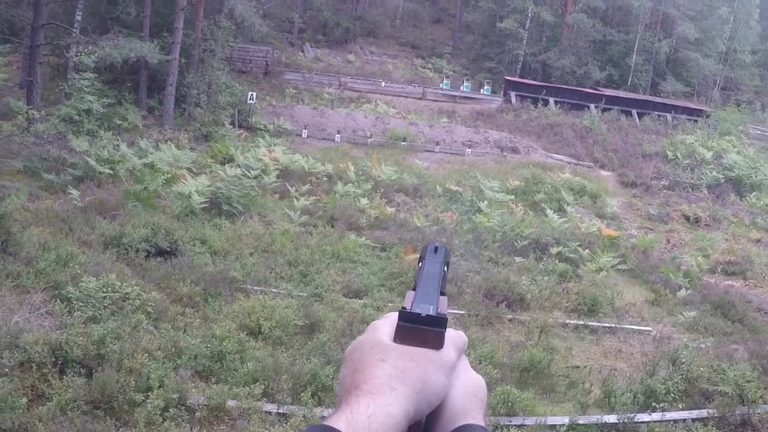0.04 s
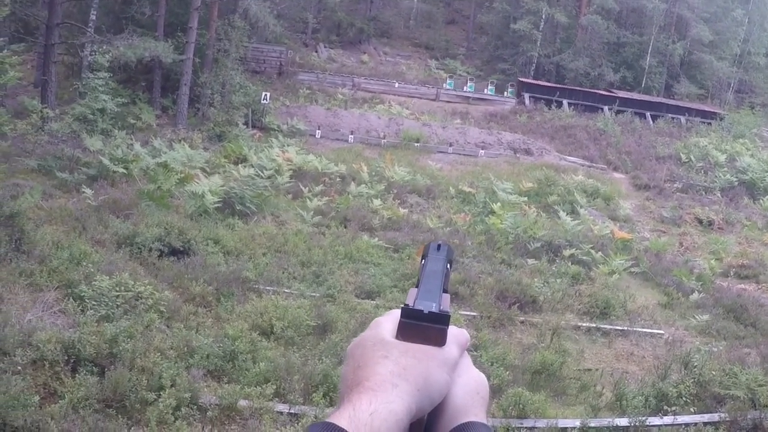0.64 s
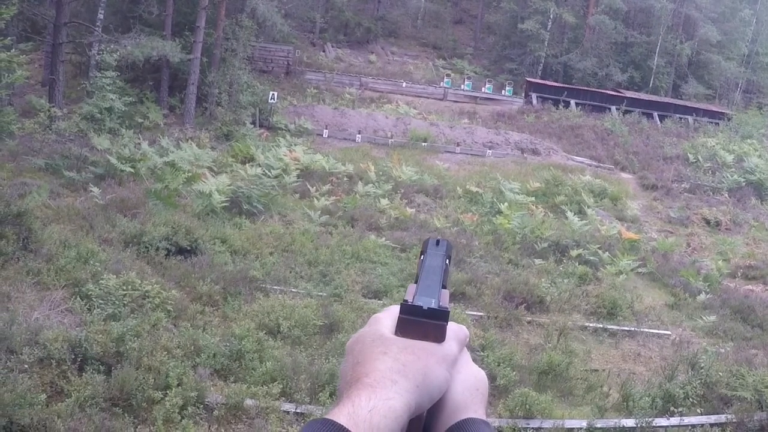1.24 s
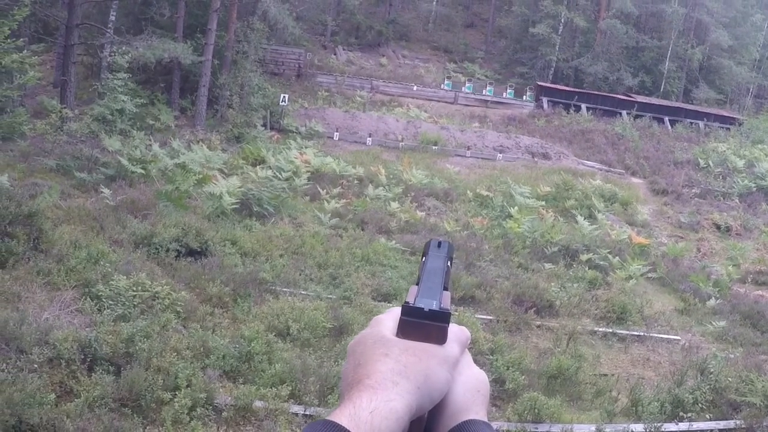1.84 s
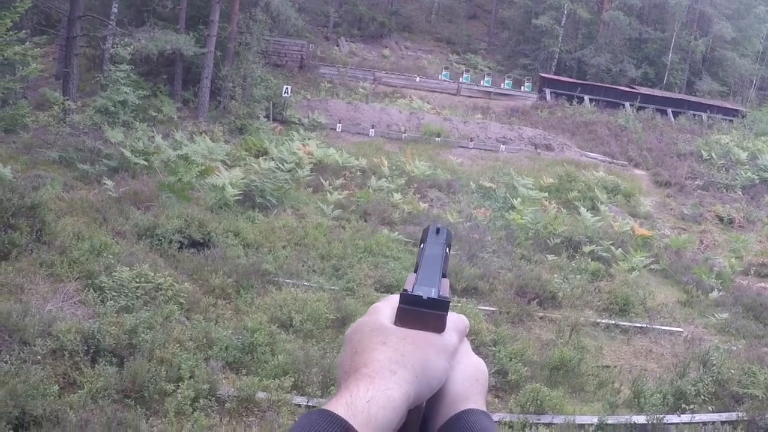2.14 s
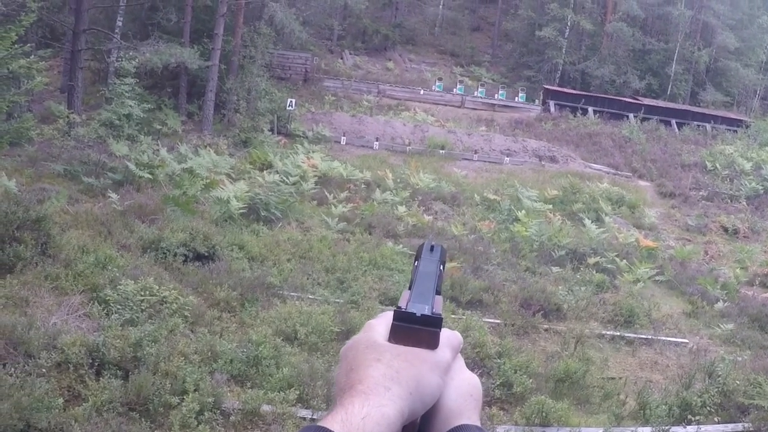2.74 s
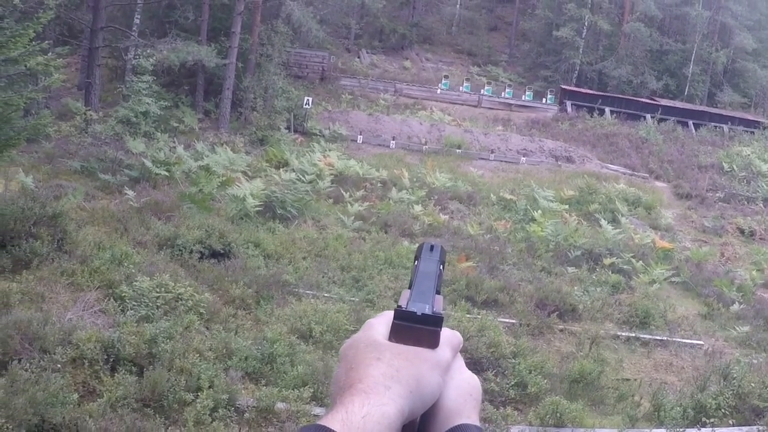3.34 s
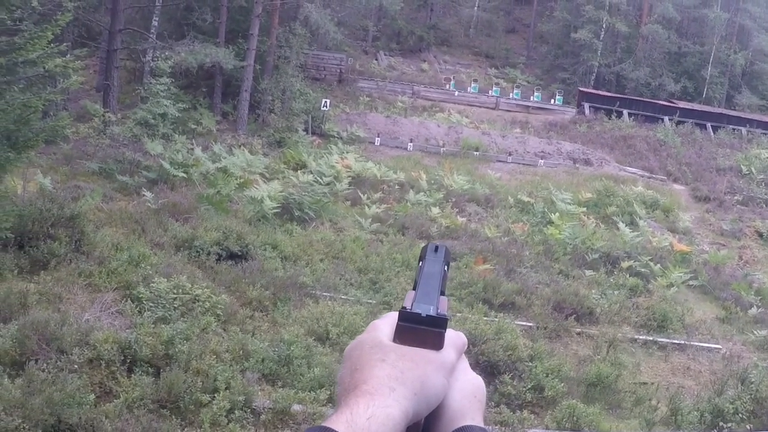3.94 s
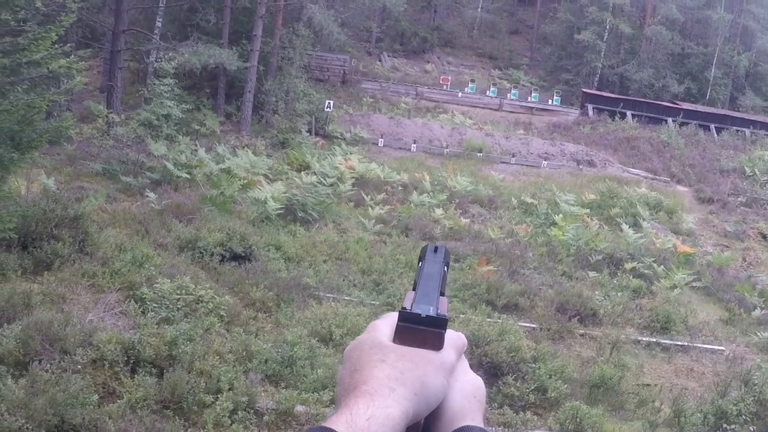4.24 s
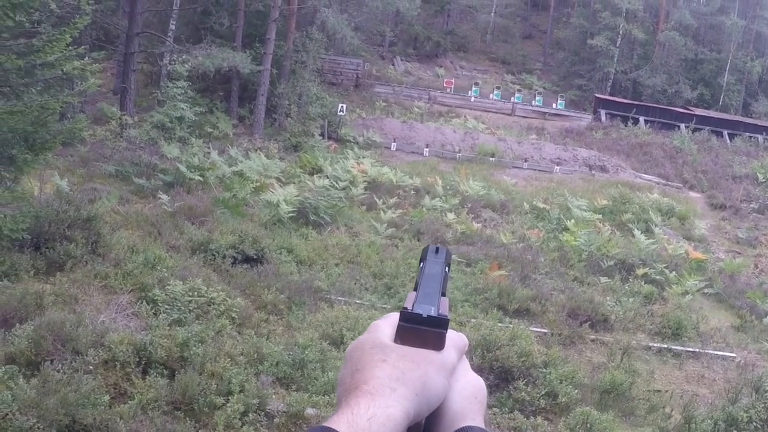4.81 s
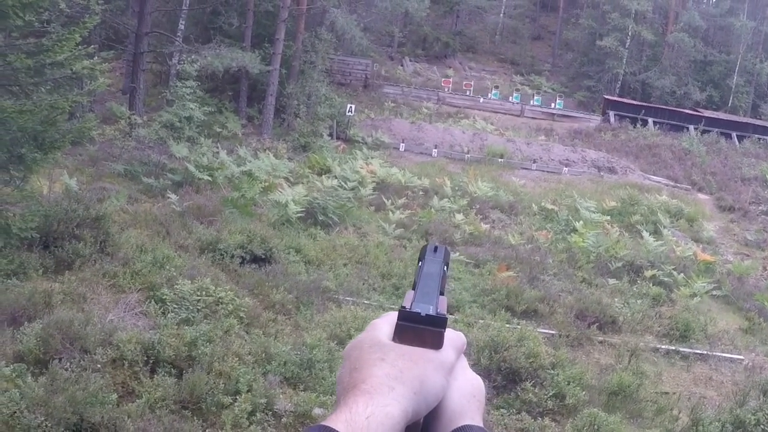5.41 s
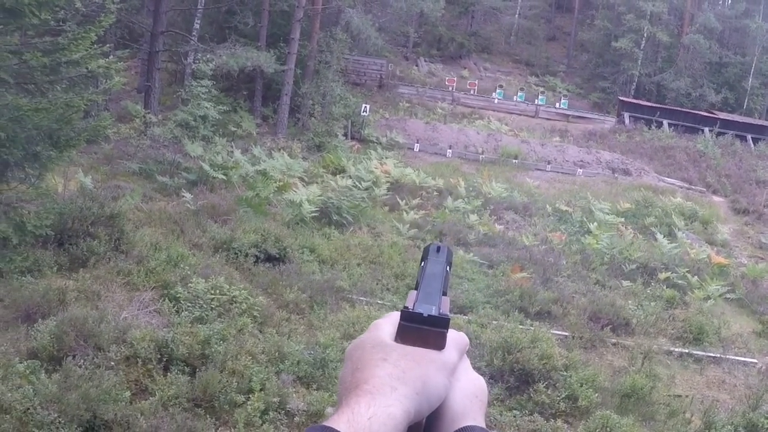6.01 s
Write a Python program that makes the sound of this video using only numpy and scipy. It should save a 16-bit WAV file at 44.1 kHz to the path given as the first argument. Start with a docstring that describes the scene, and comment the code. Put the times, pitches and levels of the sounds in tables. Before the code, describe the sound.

A pistol fires about fifteen sharp shots at arm's length from the microphone in a forest clearing. Single shots and quick pairs come with short pauses at first, then crowd together toward the end. Each blast briefly overloads the microphone, carries a metallic clack of the slide, and leaves short echoes and a fading tail in the trees. Spent cases tick faintly under light wind.

```python
"""Pistol shots at a forest clearing

A pistol fires singly and in quick pairs, an arm's length from a head-worn camera, in light wind.
Each muzzle blast rings the camera housing and overloads the microphone; the gain ducks and creeps back.
The slide clacks, spent cases drop, the trees scatter a long tail and far surfaces return a few echoes."""
import sys
import numpy as np
from scipy import signal
from scipy.fft import rfft, irfft
from scipy.io import wavfile
from scipy.ndimage import uniform_filter1d, minimum_filter1d

SR = 44100
rng = np.random.default_rng(int(sys.argv[2]) if len(sys.argv) > 2 else 0)


def log_audio(samples):
    """Write samples as a 16-bit WAV file to the path given in sys.argv[1]."""
    # one column per channel
    frames = np.atleast_2d(samples).T
    # limit to full scale, then quantise
    limited = np.clip(frames, -1, 1)
    pcm = np.round(limited * 32767).astype(np.int16)
    wavfile.write(sys.argv[1], SR, pcm)


N = 267687
LEAD = SR // 2  # samples before t = 0, so that an earlier shot can ring on
TOTAL = N + LEAD


def from_db(db):
    """Amplitude ratio for a level in decibels."""
    return 10 ** (np.asarray(db) / 20)


def at_hz(table, hz, column=1):
    """Interpolation of a table column along log frequency."""
    columns = np.transpose(table)
    return np.interp(np.log(np.maximum(hz, 1)), np.log(columns[0]), columns[column])


def add(track, onset_s, sound):
    """Superposition: a sound joins the track at its onset."""
    start = LEAD + round(onset_s * SR)
    track[start:start + len(sound)] += sound[:TOTAL - start]


def decay(t, t60):
    """Exponential decay by 60 dB in t60 seconds."""
    return np.exp(-np.log(1000) * t / t60)


def butter(x, hz, kind, order=2):
    """Causal low-, high- or band-pass filter."""
    return signal.sosfilt(signal.butter(order, hz, kind, fs=SR, output="sos"), x)


def coloured(x, spectrum, size=8192):
    """Minimum-phase filtering to a given spectrum: nothing sounds early."""
    hz = np.arange(size // 2 + 1) * SR / size
    cepstrum = irfft(np.log(from_db(at_hz(spectrum, hz))))
    cepstrum[1:size // 2] *= 2
    cepstrum[size // 2 + 1:] = 0
    impulse_response = irfft(np.exp(rfft(cepstrum)))
    return signal.fftconvolve(x, impulse_response)[:len(x)]


def even_noise(count, size=64):
    """Noise normalised to a steady short-time power."""
    noise = rng.standard_normal(count)
    return noise / np.sqrt(uniform_filter1d(noise ** 2, size))


def impacts(hits, spectrum, t60):
    """Heavily damped metal contacts: a short noise burst for each (t/s, level/dB)."""
    t = np.arange(SR // 20) / SR
    out = np.zeros(TOTAL)
    for onset_s, db in hits:
        add(out, onset_s, from_db(db) * even_noise(len(t)) * decay(t, t60))
    return coloured(out, spectrum)


# Spectrum of wind and hiss: f/Hz, level/dB
WIND_SPECTRUM = [(20, -29.5), (42, -29), (70, -47.5), (150, -59.5), (400, -58.5), (1200, -59.5),
                 (3000, -65), (6000, -71.5), (8500, -79.5), (9500, -71.5), (10500, -86), (15000, -85)]

def wind(puff_s=5.690, puff_width_s=0.027, puff_db=-21, puff_hz=44, eddy_db=-9):
    """Turbulence at the microphone over a faint hiss; one stronger puff rocks the diaphragm."""
    t = (np.arange(TOTAL) - LEAD) / SR - puff_s
    eddies = butter(rng.standard_normal(TOTAL), [50, 110], "band")
    rocking = np.sin(2 * np.pi * puff_hz * t) + from_db(eddy_db) * eddies / eddies.std()
    puff = from_db(puff_db) * rocking * np.exp(-(t / puff_width_s) ** 2)
    return coloured(rng.standard_normal(TOTAL), WIND_SPECTRUM) + puff


# Reverberation of the trees: f/Hz, level/dB, T60/s before spreading loss
TREE_REVERBERATION = [(40, -27.5, 0.67), (100, -30, 3.9), (170, -39, 0.43), (346, -21, 3.5),
                      (467, -23.5, 5.4), (760, -26, 3.1), (1106, -19.5, 3.1), (1920, -23, 2.6),
                      (3170, -23, 1.62), (4500, -19.5, 1.5), (5700, -25.5, 0.49), (9000, -37, 0.62),
                      (14700, -46.5, .75)]

def tree_scatter(onset_s=0.023, spread_s=0.03, spread_power=0.65, grain_db=2.0, bands=22):
    """Scattering by countless trunks: the tail thins with distance and the air absorbs its treble."""
    t = np.arange(2 * SR) / SR
    knots = t[::SR // 500]
    grain = from_db(grain_db * np.interp(t, knots, rng.standard_normal(len(knots))))
    noises = rng.standard_normal((2, len(t))) * grain  # adjacent bands get independent noise
    edges_hz = np.geomspace(25, 18000, bands + 1)
    tail = np.zeros(len(t))
    for k, (low, high) in enumerate(zip(edges_hz, edges_hz[1:])):
        hz = np.sqrt(low * high)
        db, t60 = at_hz(TREE_REVERBERATION, hz), at_hz(TREE_REVERBERATION, hz, column=2)
        tail += from_db(db) * butter(noises[k % 2], [low, high], "band") * decay(t, t60)
    build_up = 1 - np.exp(-(t / onset_s) ** 2)
    spreading = (1 + t / spread_s) ** -spread_power
    tail *= build_up * spreading
    out = np.zeros(TOTAL)
    for onset_s, _, _, forest_db, _ in SHOTS:
        add(out, onset_s, from_db(forest_db) * tail)
    return out


# Echoes from banks, targets and the tree line: delay/s, level/dB, smear/s
ECHO_PATHS = [(0.041, -25, 0.0021), (0.0918, -34.5, 0.0039), (.1040, -13, 0.0017), (.1160, -19, 0.0014),
              (0.1595, -13, 0.0024), (.1890, -22, 0.011), (0.2362, -28.5, 0.011), (0.317, -30.5, 0.014)]
# Spectrum of the echoes: f/Hz, level/dB
ECHO_SPECTRUM = [(60, -4.5), (180, -13), (480, 0.5), (800, -1), (1400, 2), (2600, -8), (4500, -14),
                 (8000, -29.5), (15000, -43.5)]

def echoes(front_db=13, rough_db=-7, offset_db=-1, db_per_forest_db=1.4):
    """Reflection from distant surfaces: each returns a sharp slap, smeared by its roughness."""
    t = np.arange(SR // 25) / SR
    front = from_db(front_db) * (t == 0)
    out = np.zeros(TOTAL)
    for onset_s, _, _, forest_db, _ in SHOTS:
        return_db = offset_db + db_per_forest_db * forest_db
        for delay_s, path_db, smear_s in ECHO_PATHS:
            slap = front + from_db(rough_db) * even_noise(len(t)) * np.exp(-t / smear_s)
            add(out, onset_s + delay_s, from_db(return_db + path_db) * slap)
    return coloured(out, ECHO_SPECTRUM)


# Landings of spent cases: t/s, level/dB
CASE_LANDINGS = [(1.192, -47), (2.700, -43), (2.746, -48)]
# Spectrum of a landing: f/Hz, level/dB
CASE_SPECTRUM = [(500, -11), (1600, -7), (2250, 16), (3300, 6), (5000, -13), (15000, -34)]

def spent_cases():
    """Damped impact: cases drop into the heather with a brief tick."""
    return impacts(CASE_LANDINGS, CASE_SPECTRUM, t60=0.0068)


# Spectrum of the slide at its rear stop: f/Hz, level/dB
REAR_STOP_SPECTRUM = [(300, -19.5), (1200, -15.5), (2300, -2), (3400, -10.5), (4450, 10), (5500, -6),
                      (9500, -11.5), (15000, -22)]
# Spectrum of the slide shutting and the trigger resetting: f/Hz, level/dB
LOCKING_SPECTRUM = [(500, -28.5), (2000, -9), (4400, 1.5), (6500, -9.5), (8700, -5.5), (11000, -19),
                    (15000, -13)]

def gun_action(back_s=0.0195, shut_s=0.034, reset_s=0.187, ping_hz=8570, ping_t60=0.059):
    """Impacts of steel: the slide hits its stop and shuts with a ping, then the trigger resets."""
    # the gun angle that brightens the crack also exposes the slide
    back = [(onset_s + back_s, -19 + 0.83 * bite_db) for onset_s, _, bite_db, *_ in SHOTS]
    shut = [(onset_s + shut_s, -28) for onset_s, *_ in SHOTS]
    reset = [(onset_s + reset_s, -44.5) for onset_s, *_ in SHOTS]
    out = impacts(back, REAR_STOP_SPECTRUM, t60=0.024)
    out += impacts(shut + reset, LOCKING_SPECTRUM, t60=0.035)
    t = np.arange(SR // 8) / SR
    ping = np.sin(2 * np.pi * ping_hz * t) * decay(t, ping_t60)
    for onset_s, crack_db, *_ in SHOTS:
        add(out, onset_s + shut_s, from_db(-47 + 1.2 * crack_db) * ping)  # clearest after hard shots
    return out


# Spectrum of the scatter from close by: f/Hz, level/dB
NEAR_SPECTRUM = [(30, -10.5), (100, 0.5), (170, 5), (270, 4.5), (500, 8), (800, -0.5), (1600, 4),
                 (3200, -4.5), (4500, 2), (6000, -9.5), (10000, -18.5), (15000, -22)]

def near_scatter(body_db=-10, body_t60=0.088, ground_db=-10, ground_s=0.011, ground_t60=0.012):
    """Early diffuse reflection: the blast scatters off the shooter and bounces off rough ground."""
    t = np.arange(SR // 8) / SR
    body = from_db(body_db) * decay(t, body_t60)
    ground = from_db(ground_db) * (t > ground_s) * decay(np.abs(t - ground_s), ground_t60)
    envelope = np.hypot(body, ground)  # incoherent sounds add in power
    out = np.zeros(TOTAL)
    for onset_s, crack_db, _, forest_db, _ in SHOTS:
        scatter_db = 0.45 * crack_db + 0.5 * forest_db
        add(out, onset_s, from_db(scatter_db) * envelope * even_noise(len(t)))
    return coloured(out, NEAR_SPECTRUM)


def gas_thumps(swell_s=0.0013, low_cut_hz=22, buffet_db=-15, buffet_hz=(100, 260), buffet_t60=0.11):
    """Rarefaction: the gas cloud sucks the diaphragm out and buffets it with eddies."""
    t = np.arange(SR // 6) / SR
    suction = -t ** 3 * np.exp(-t / swell_s)
    swing = butter(suction, low_cut_hz, "high")  # the microphone's low cut adds a slow swing back
    swing /= np.abs(swing).max()
    out = np.zeros(TOTAL)
    for onset_s, *_, thump_db in SHOTS:
        eddies = butter(rng.standard_normal(len(t)), buffet_hz, "band")
        buffet = from_db(buffet_db) * eddies / eddies.std() * decay(t, buffet_t60)
        add(out, onset_s, from_db(thump_db) * (swing + buffet))
    return out


# Shots, the first just before t = 0: t/s, crack/dB, treble bite/dB, forest return/dB, gas thump/dB
SHOTS = [(-.143, -4, -11.5, -7, -22), (.4308, 5.5, 4.5, -1, 1.5), (0.5721, 3.5, 0, -2, -24),
         (1.5093, 1, 2.5, -1, -24.5), (2.0760, 5, 5.5, -3, .5), (2.1264, 5.5, -3.5, -5, -21),
         (3.0688, 1, 3, -1.5, -35.5), (3.6787, 1, 0.5, 0, -32.5), (4.0787, -1.5, -13, 0.5, -41.5),
         (4.4510, 10, -4.5, -1, -6.5), (4.5162, 5, 2.5, -5.5, -18), (4.9577, 1.5, 2, 0, -26),
         (5.1970, -2.5, 0, -2.5, -42), (5.4754, -6.5, -1.5, -2, -37), (5.6442, 6.5, 9, 1.5, -7.5),
         (5.8242, 4.5, 4, 0.5, -33.5)]
# Spectrum of the muzzle blast: f/Hz, level/dB
BLAST_SPECTRUM = [(30, -15.5), (100, 1), (270, 7.5), (500, 4.5), (800, -3), (1600, 5), (3200, 2), (4300, 6),
                  (6000, -8.5), (10000, -23), (15000, -28.5)]

def muzzle_blasts(shock_db=11, shock_s=0.00014, jet_db=1, jet_hold_s=0.0014, jet_t60=0.014,
                  bite_hz=2600):
    """Sudden expansion of gas: a shock front, then the roar of the turbulent jet."""
    t = np.arange(SR // 8) / SR
    shock = from_db(shock_db) * (1 - t / shock_s) * np.exp(-t / shock_s)
    jet_envelope = from_db(jet_db) * decay(np.maximum(t - jet_hold_s, 0), jet_t60)
    out = np.zeros(TOTAL)
    for onset_s, crack_db, bite_db, *_ in SHOTS:
        crack = shock + jet_envelope * even_noise(len(t))
        # directivity: the muzzle points a little differently each time, shelving the treble up or down
        crack += (from_db(bite_db) - 1) * butter(crack, bite_hz, "high", order=1)
        add(out, onset_s, from_db(crack_db) * crack)
    return coloured(out, BLAST_SPECTRUM)


# Peaks and dips of the camera housing: f/Hz, bandwidth/Hz, gain/dB
HOUSING_RESONANCES = [(1133, 380, 10), (1430, 420, -4), (1615, 350, 5.5), (1938, 190, -7.5), (2340, 520, 3),
                      (2850, 230, -3), (3243, 470, 7.5), (4346, 320, 4), (5190, 740, -8)]

def housing(x):
    """Resonance and antiresonance: the camera's case reinforces some frequencies and weakens others."""
    for hz, width_hz, db in HOUSING_RESONANCES:
        root_gain = from_db(db / 2)
        damping = np.pi * width_hz / SR
        tuning = -2 * np.cos(2 * np.pi * hz / SR)
        numerator = [1 + damping * root_gain, tuning, 1 - damping * root_gain]
        denominator = [1 + damping / root_gain, tuning, 1 - damping / root_gain]
        x = signal.lfilter(numerator, denominator, x)
    return x


def scene():
    """Superposition of gun, reflections and wind at the microphone inside the housing."""
    gun = muzzle_blasts() + gas_thumps() + gun_action() + spent_cases()
    reflections = near_scatter() + tree_scatter() + echoes()
    return housing(gun + reflections + wind())[None, LEAD:]


def smooth(x, time_constant_s):
    """Exponential averaging by a one-pole low-pass."""
    pole = np.exp(-1 / (time_constant_s * SR))
    return signal.lfilter([1 - pole], [1, -pole], x)


def gain_control(x, threshold_db=2, slope=0.85, hold_s=0.59, release_db_per_s=17, attack_s=0.004):
    """Compression: the gain drops too late for a blast's front, stays down a while, then recovers."""
    level_db = 10 * np.log10(smooth(x ** 2, time_constant_s=0.0014) + 1e-12)
    cut_db = slope * np.maximum(level_db - threshold_db, 0)
    half_hold = int(hold_s * SR / 2)
    held_db = -minimum_filter1d(-cut_db, 2 * half_hold + 1, origin=half_hold, mode="constant")
    ramp_db = release_db_per_s * np.arange(N) / SR
    released_db = np.maximum.accumulate(held_db + ramp_db, axis=-1) - ramp_db
    return x * from_db(-smooth(released_db, attack_s))


def record(dry, ceiling=0.91, stopband_hz=16600):
    """Saturation: after the gain control, overload flattens the blasts and a low-pass cuts the top."""
    ducked = gain_control(dry)
    saturated = ducked / (1 + (ducked / ceiling) ** 4) ** (1 / 4)
    return signal.sosfilt(signal.cheby2(14, 90, stopband_hz, fs=SR, output="sos"), saturated)


dry = scene()
out = record(dry)
log_audio(out)
```